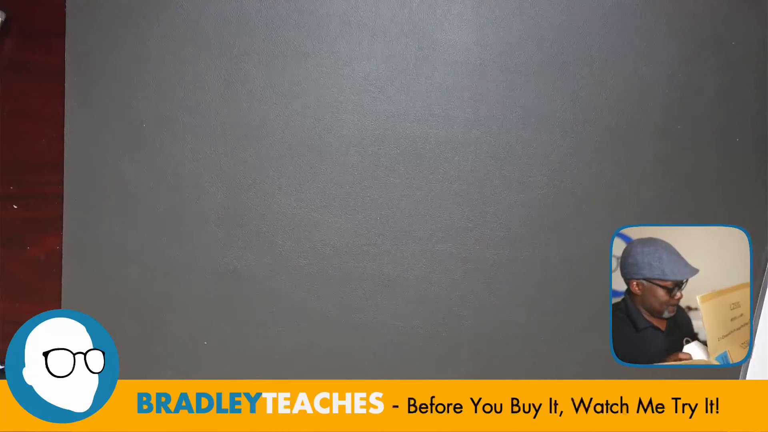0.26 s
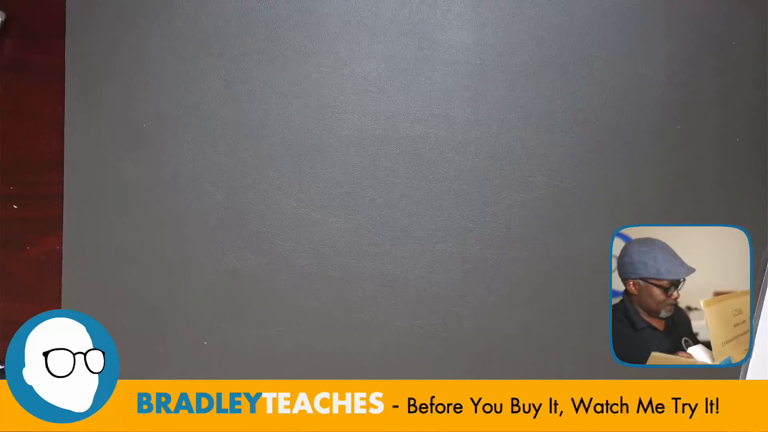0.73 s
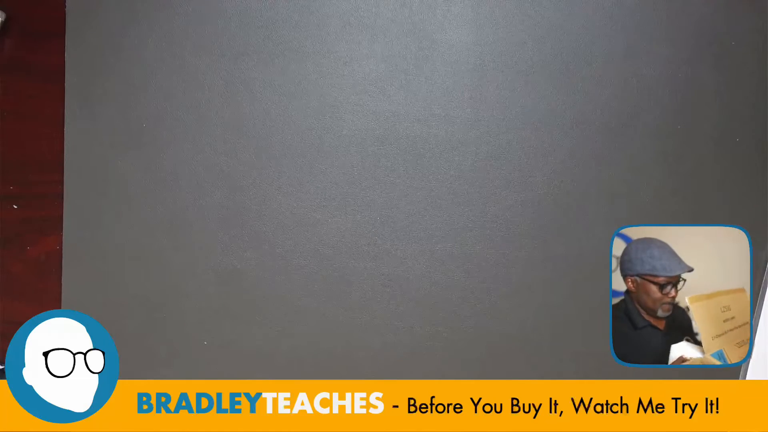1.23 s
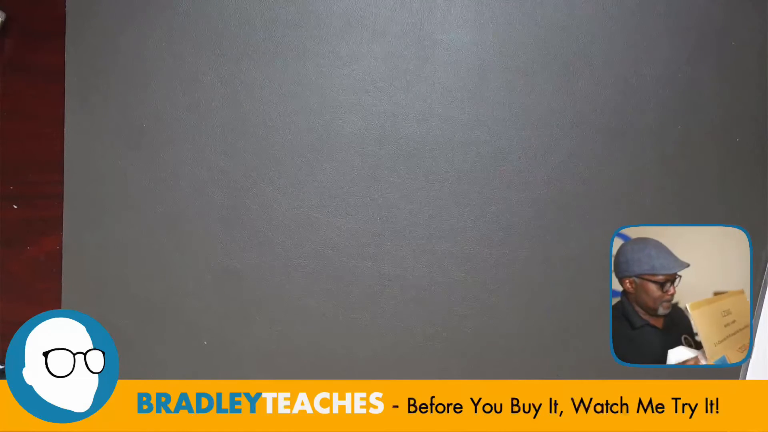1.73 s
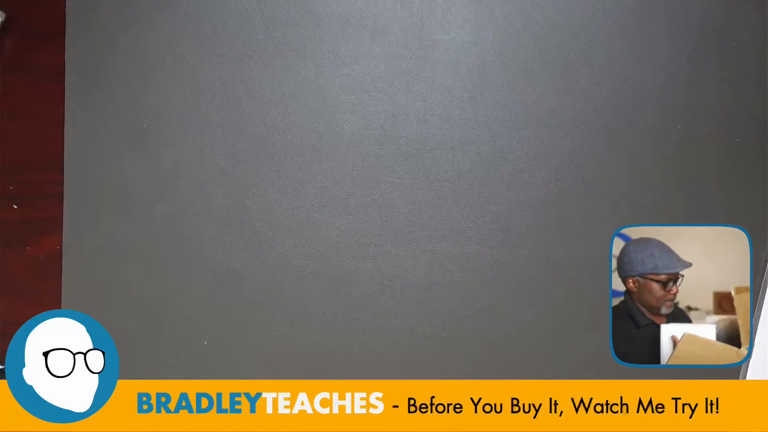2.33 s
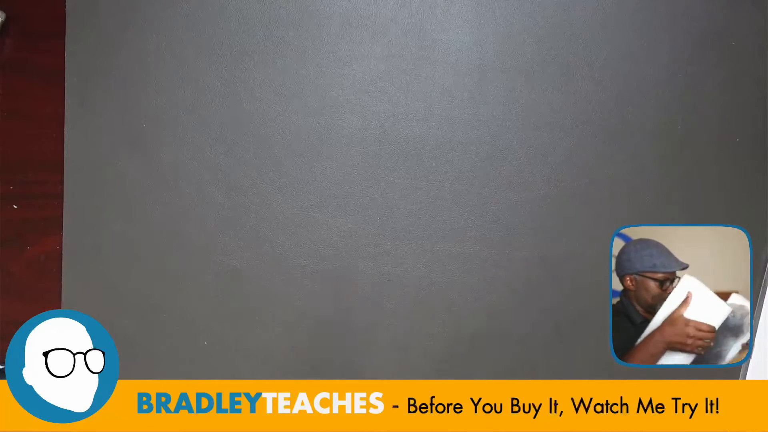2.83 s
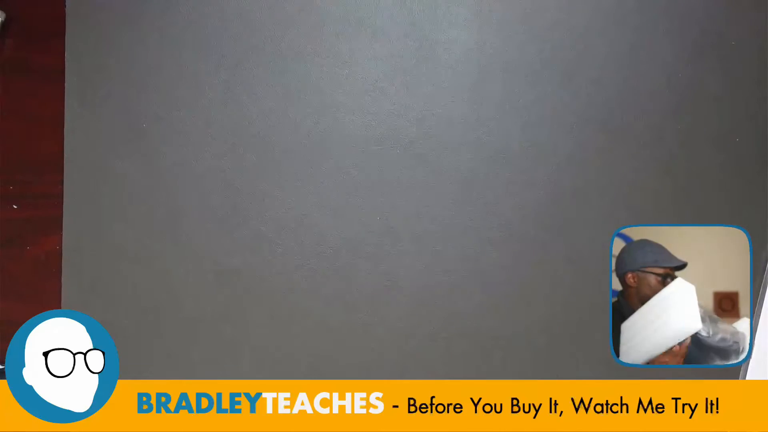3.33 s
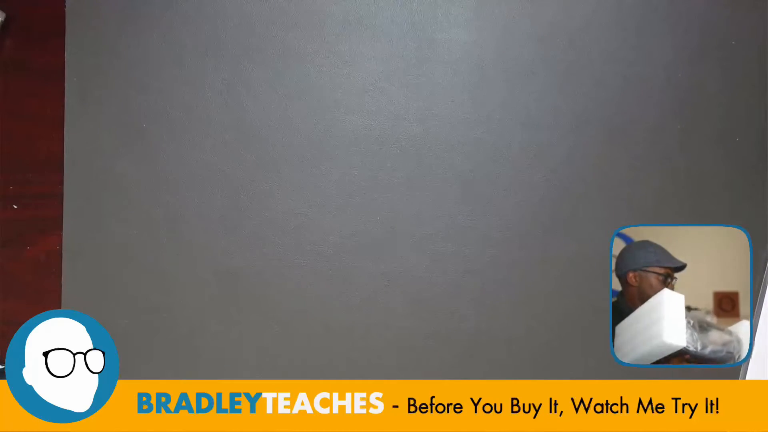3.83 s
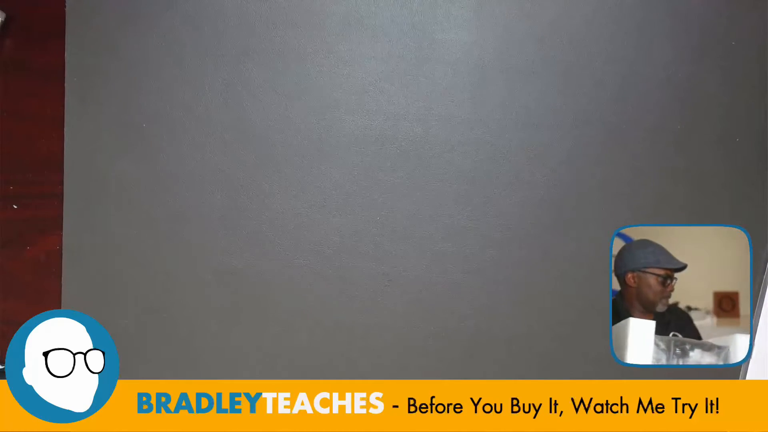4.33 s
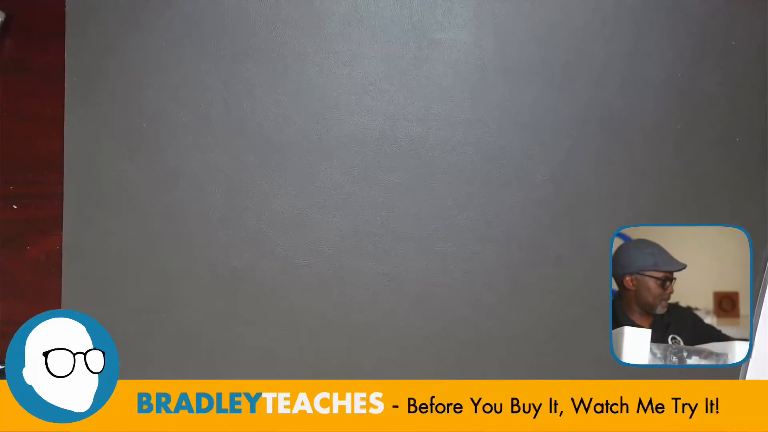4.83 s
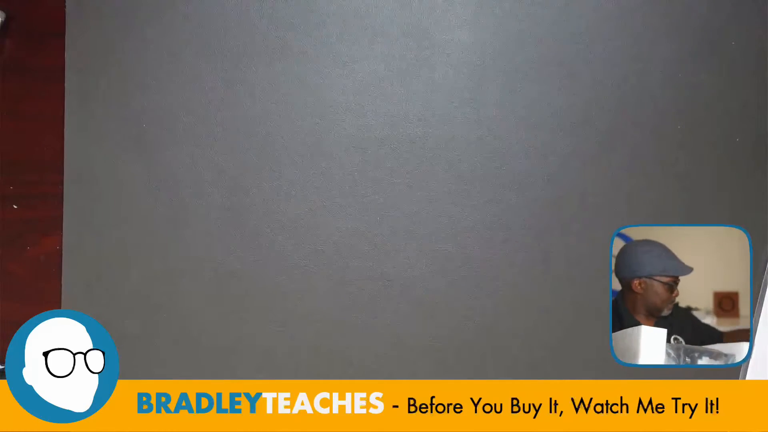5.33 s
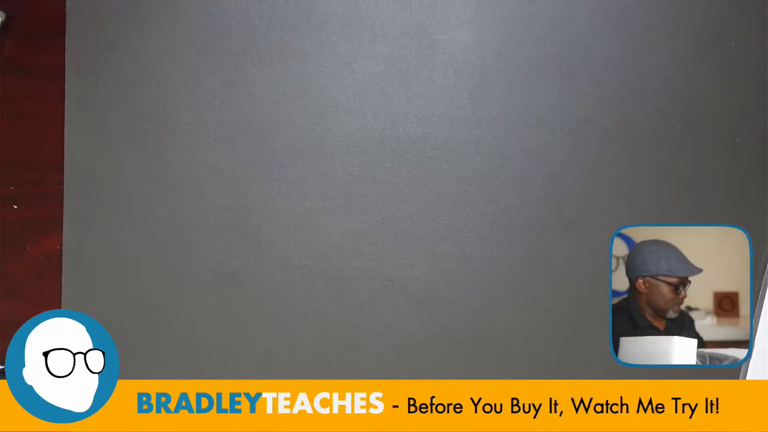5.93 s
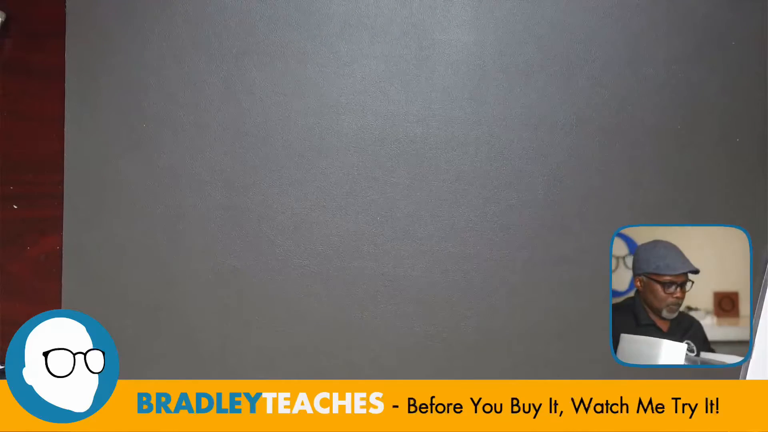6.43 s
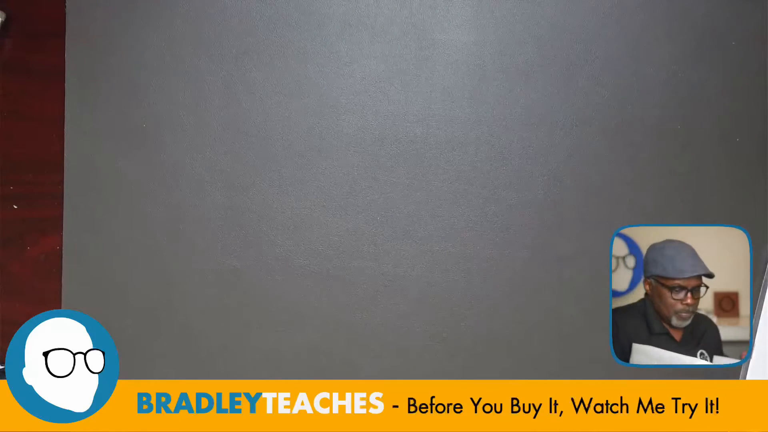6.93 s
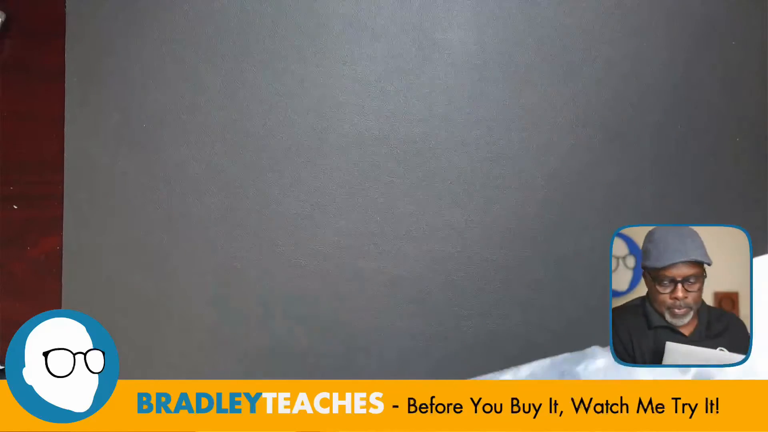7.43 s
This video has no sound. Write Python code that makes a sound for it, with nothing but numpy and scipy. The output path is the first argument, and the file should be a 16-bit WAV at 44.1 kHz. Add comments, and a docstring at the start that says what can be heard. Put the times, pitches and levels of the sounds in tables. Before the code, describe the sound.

Close, uneven rubbing of packing foam against cardboard, with hollow knocks, a crinkling plastic wrapper and a heavy thump on a desk.

```python
"""A soft scrape of foam on cardboard, close up in a small room: a foam block is worked out of its box
and set down on a desk. The beads hiss and judder as they catch on the card, the foam groans on the
desk, and a plastic wrapper crackles. Hands rumble the box, blows knock its panels, and heavy jolts
sway the desk with a deep thump. Faint room tone and hum sink behind a noise gate in the pauses."""
import sys
import numpy as np
from scipy import signal
from scipy.fft import rfft, irfft, next_fast_len
from scipy.io import wavfile
from scipy.ndimage import uniform_filter1d, map_coordinates

SR = 44100
rng = np.random.default_rng(int(sys.argv[2]) if len(sys.argv) > 2 else 0)


def wav_record(signal):
    """Record a signal, one row per channel, as 16-bit PCM in the file named by sys.argv[1]."""
    frames = np.transpose(np.atleast_2d(signal))
    bounded = np.clip(frames, -1, 1)
    # unit amplitude maps onto the largest positive 16-bit level
    quanta = np.round(bounded * 32767).astype(np.int16)
    wavfile.write(sys.argv[1], SR, quanta)


N = 338247

# room tone spectrum: (f/Hz, level/dB)
ROOM_TONE_EQ = [(15, -48.5), (25, -17.5), (66, -7), (122, -4), (188, -17), (703, -24), (871, -22.5),
                (1020, -28), (4150, -32.5), (15500, -30.5)]
# electrical hum partials: (f/Hz, level/dB)
HUM_PARTIALS = [(118.4, -56), (236, -60.5)]
# reverb time of the room: (f/Hz, t60/s)
ROOM_DECAY = [(100, 0.096), (260, 0.2), (700, 0.26), (3000, 0.27), (12000, 0.66)]
# low resonances of box and room: (f/Hz, width/Hz, level/dB)
BOX_MODES = [(105, 28, 3.5), (172.8, 11, 4.5), (230, 18, 3), (265.5, 25, -2.5), (314, 36, -15),
             (394.2, 15, -2.5), (484, 68, -14)]
# the microphone's treble ripples: (f/Hz, width/Hz, level/dB)
MIC_RIPPLES = [(5670, 200, -4), (6280, 320, 2.5), (8060, 180, -1.5), (11400, 300, -1.5), (15730, 2500, -4)]

# tone colours of foam hiss, bead fizz, cardboard, judder and snap: (f/Hz, level/dB)
HISS_EQ = [(700, -35), (1500, -7), (2300, -3.5), (3800, 0), (5000, -2), (7000, -7), (9000, -18),
           (12000, -48.5)]
FIZZ_EQ = [(5000, -34), (8000, -4.5), (9800, -5), (12000, -12), (16000, -16)]
CARD_EQ = [(120, -23.5), (280, -0.5), (430, -2), (720, -2), (1080, 0.5), (1600, -1), (2300, -7.5),
           (4000, -32.5)]
JUDDER_EQ = [(60, -3), (200, -2), (700, 4.5), (1200, -2.5), (2200, -7.5), (4500, -5.5), (7000, -27),
             (10000, -30.5), (16000, -44.5)]
SNAP_EQ = [(300, -15), (1200, -5.5), (3800, 5), (7000, 1), (11000, -7.5), (16000, -21)]
# tone colours of the brushing sleeve, wrapper ticks and the sub-bass rumble: (f/Hz, level/dB)
BRUSH_EQ = [(3500, -47), (5300, -9), (6300, -5), (6900, -10), (7700, -11.5), (11000, -33.5)]
WRAPPER_EQ = [(800, -22.5), (2500, -5.5), (6000, 0.5), (9500, 1), (12000, -6.5), (16000, -17)]
SUB_BASS_EQ = [(15, -17.5), (37, 6.5), (55, -14.5), (90, 7), (150, -27), (400, -68)]

# light brushes of a sleeve: (t/s, rise/s, fall/s, level/dB)
BRUSHES = [(4.925, 0.043, 0.123, -45)]
# fader curve of the flexing wrapper: (t/s, relative level/dB)
WRAPPER_FADER = [(2.9, -78), (3.1, -40.5), (3.55, -45.5), (3.9, -45), (4.42, -46.5), (4.9, -60.5),
                 (4.98, -49.5), (5.42, -70)]
# snaps of wrapper and foam beads: (t/s, relative level/dB, f/Hz)
SNAPS = [(0.0834, -30, 3380), (0.159, -26, 1760), (0.6418, -14, 1550), (0.7577, -15, 3300),
         (1.03, -6, 1480), (1.0644, -20, 1900), (1.0927, -15.5, 1670), (1.1657, -12.5, 3660),
         (1.5546, -14.5, 1840), (2.128, -13, 1720), (2.9537, -17, 2170), (3.041, -13, 3460),
         (3.211, -19.5, 4650), (3.305, -16.5, 4070), (3.3774, -15.5, 3350), (3.5314, -17, 4040),
         (3.5973, -19, 6450), (3.6172, -17, 7600), (3.7383, -17, 2650), (3.8508, -19, 4170),
         (3.8714, -22, 6080), (3.9396, -19.5, 4200), (4.2367, -20, 4920), (4.364, -14.5, 7100),
         (4.4218, -16, 8800), (4.433, -21, 2150), (4.5501, -19.5, 4630), (4.6342, -20, 3290),
         (5.409, -36.5, 4730), (5.548, -44, 5300), (5.6453, -46, 4470), (5.679, -32.5, 5400),
         (5.8737, -33, 2010), (6.0603, -37, 4350), (7.0279, -23, 4220)]
# hands pushing the box about: (t/s, rise/s, fall/s, level/dB)
PUSHES = [(.14, 0.053, 0.064, -39.5), (.53, 0.061, 0.89, -40), (1.03, 0.067, .25, -37),
          (1.44, 0.14, 0.2, -38), (1.88, .18, 0.15, -31.5), (2.33, 0.076, 0.086, -42.5),
          (3.038, 0.023, 0.072, -20), (3.18, .09, 0.2, -22.5), (3.69, 0.062, 0.71, -44.5),
          (4.47, 0.046, 0.2, -35.5), (4.62, 0.1, 0.086, -22), (4.95, 0.18, 0.16, -45),
          (5.68, 0.15, 0.27, -55.5), (6.34, 0.16, 0.24, -50.5), (6.56, 0.13, 0.11, -25.5),
          (6.925, 0.024, 0.18, -36), (7.22, 0.036, 0.16, -44)]
# jolts that sway the desk: (t/s, level/dB, f/Hz, decay/s)
JOLTS = [(3.045, -5, 36.6, 0.12), (3.335, -15.5, 37.7, 0.11), (4.645, -21, 36.7, 0.063),
         (6.96, -35.5, 39.8, 0.21), (7.462, -28.5, 38.8, 0.072)]
# foam rubbing on the desk: (t/s, length/s, level/dB, f/Hz)
GROANS = [(3.346, 0.037, -27, 329), (4.694, 0.15, -32.5, 423), (4.78, 0.1, -39, 404)]
# foam juddering along the card: (t/s, length/s, level/dB, slip rate/Hz)
JUDDERS = [(1.039, 0.13, -33.5, 300), (6.592, 0.05, -22, 480), (6.634, 0.078, -37, 260),
           (6.695, 0.054, -26.5, 240), (7.222, 0.032, -45, 280)]
# quick scuffs of foam: (t/s, relative level/dB, length/s)
SCUFFS = [(0.637, -19, 0.051), (0.75, -21, 0.046), (1.48, -18.5, 0.038), (1.875, -13.5, 0.057),
          (2.085, -12, 0.03), (3.457, -11.5, 0.038), (3.656, -13.5, 0.022)]
# blows on box and foam: (t/s, level/dB, f/Hz, ring length/cycles, room send/dB, clack mix/dB)
KNOCKS = [(0.1598, -25, 630, 9.2, -1, 1), (0.642, -29.5, 172, 8.7, -1, -8),
          (0.761, -21.5, 212, 13, -15, -22.5), (0.863, -29, 91.5, 14, -5, -26.5),
          (0.967, -27.5, 760, 6.3, 3.5, -4), (1.0315, -2.5, 1100, 11.6, -10, -6),
          (1.035, -9, 170, 5.4, -5.5, -24), (1.041, -14.5, 308, 6.2, 0, -20.5),
          (1.448, -24, 203, 6.7, -14, -18), (1.5658, -15, 484, 9.8, -4.5, -9.5),
          (1.572, -21.5, 198, 6.5, -6, -22), (1.896, -8, 188, 6.3, -8, -36), (2.0, -17, 470, 8.8, -3, -15),
          (2.018, -21.5, 129, 7.2, -7, -25), (2.13, -10, 182, 8.3, -4, -10.5),
          (2.384, -22.5, 160, 2.7, 0, -22), (3.0395, -4, 217, 12, -9, -9.5),
          (3.052, -8, 387, 4.5, -3, -25.5), (3.215, -17, 101, 6.6, 0.5, -16.5),
          (3.253, -17, 109, 5.2, -6, -33), (3.307, -13.5, 281, 17, -6, -6.5),
          (3.3311, 2, 222, 2.4, -6, -21), (3.357, -15.5, 275, 4, -1, -22.5),
          (3.74, -27, 160, 9.6, -7, -6.5), (4.495, -30.5, 272, 5.3, 7, -19),
          (4.634, -12.5, 194, 9.2, -14.5, -14), (4.699, -10, 192, 8.7, -7.5, -11.5),
          (5.182, -32, 254, 11, -2, -9.5), (5.964, -47, 800, 6, 4, -10), (6.714, -14, 165.5, 11, -12, -5.5),
          (7.5952, -34.5, 740, 4.4, -9, -2)]
# strokes of foam along the card: (t/s, rise/s, fall/s, hiss level/dB, rasp level/dB)
STROKES = [(0, 0.0033, 0.13, -43.5, -43.5), (.17, 0.13, 0.14, -31.5, -34), (.53, 0.17, 0.31, -37.5, -42),
           (1.007, 0.036, 0.12, -34.5, -30.5), (1.21, 0.12, 0.081, -33.5, -37.5),
           (1.45, 0.067, 0.093, -39, -42.5), (1.62, 0.079, 0.14, -54, -56),
           (1.729, 0.16, 0.098, -30, -36.5), (1.97, 0.12, 0.13, -35, -42), (2.271, 0.083, 0.32, -37.5, -41),
           (2.69, 0.16, 0.11, -40.5, -46.5), (2.951, .012, 0.1, -34.5, -37.5),
           (3.039, 0.0095, 0.091, -26.5, -32), (3.13, 0.078, 0.099, -31, -37),
           (3.29, 0.078, 0.27, -35.5, -42.5), (3.655, 0.016, 0.2, -37.5, -40),
           (3.82, 0.057, 0.081, -40, -41), (3.93, 0.073, 0.15, -38, -46.5), (4.07, 0.079, 0.4, -36.5, -41),
           (4.6, 0.1, .13, -37.5, -38.5), (4.93, 0.11, .14, -46, -49), (5.677, .008, .3, -58, -68.5),
           (5.9, 0.072, .06, -62, -61), (6.33, 0.076, 0.27, -42.5, -51.5), (6.519, .025, 0.18, -35.5, -41),
           (6.585, .025, 0.098, -25.5, -23.5), (6.68, 0.022, 0.13, -32, -33.5),
           (6.87, .24, 0.24, -41.5, -44.5), (7.222, 0.017, 0.08, -34, -37.5),
           (7.39, 0.14, 0.21, -49.5, -53.5)]


def amp(db):
    """Decibels to gain."""
    return 10 ** (np.asarray(db) / 20)


def unit(x):
    """Scale to rms 1."""
    return x / np.sqrt(np.mean(x ** 2) + 1e-20)


def along(points, hz):
    """Read (f/Hz, value) points on a log frequency axis."""
    freqs, values = np.transpose(points)
    return np.interp(np.log(hz + 1), np.log(freqs + 1), values)


def wobble(rate):
    """A smooth random curve, rate knots a second."""
    return map_coordinates(rng.standard_normal(4096), [np.arange(N) * rate / SR], mode="wrap")


def colour(x, gain):
    """Minimum-phase EQ whose gain is a function of frequency."""
    size = 2 * next_fast_len(len(x) // 2 + 4096)
    cepstrum = irfft(np.log(np.maximum(gain(np.fft.rfftfreq(size, 1 / SR)), 1e-6)))
    cepstrum[1:size // 2] *= 2
    cepstrum[size // 2 + 1:] = 0
    return irfft(rfft(x, size) * np.exp(rfft(cepstrum)))[:len(x)]


def shaped(x, eq):
    """x through an (f/Hz, level/dB) curve, at rms 1."""
    return unit(colour(x, lambda hz: amp(along(eq, hz))))


def add(track, start, x):
    """Mix x into the track, start seconds in."""
    first = max(round(start * SR), 0)
    track[first:first + len(x)] += x[:max(N - first, 0)]


def grains(rate, spread_db, smooth):
    """Tiny random slips of uneven size; smooth is the share of power in plain rubbing noise."""
    slips = (rng.random(N) < rate / SR) * rng.standard_normal(N)
    slips *= amp(spread_db * rng.standard_normal(N))
    return np.sqrt(1 - smooth) * unit(slips) + np.sqrt(smooth) * rng.standard_normal(N)


def swells(moves):
    """Envelope of moves (t/s, rise/s, fall/s, level/dB) that speed up and run out, summed in power."""
    power, t = np.zeros(N), np.arange(3 * SR // 2) / SR
    for start, rise, fall, db in moves:
        gather = np.sin(np.pi / 2 * np.clip(t / rise, 0, 1)) ** 0.85
        run_out = np.exp(-np.maximum((t - rise) / fall, 0) ** 1.27)
        add(power, start, (amp(db) * gather * run_out) ** 2)
    return np.sqrt(power)


def room_tone():
    """The bed: faint room noise and a wavering electrical hum."""
    t = np.arange(N) / SR
    hum = sum(amp(db + wobble(2.3)) * np.sqrt(2) * np.sin(2 * np.pi * hz * t) for hz, db in HUM_PARTIALS)
    return hum + amp(-53) * shaped(rng.standard_normal(N), ROOM_TONE_EQ)


def noise_gate(key, threshold_db=-57.5, depth_db=-13, window_s=0.044):
    """Gain of a soft gate that closes whenever the key signal falls quiet."""
    power = np.abs(uniform_filter1d(key ** 2, int(window_s * SR)))
    shut = 1 / (1 + (power / amp(threshold_db) ** 2) ** 2)
    return amp(depth_db * shut)


def reverb(x, predelay_s=0.0054):
    """The small room's tail, longest in the treble, with the same energy as the dry sound."""
    hz, t, spectrum = signal.stft(rng.standard_normal(SR // 2), SR, nperseg=256)
    decay = amp(-60 * t / along(ROOM_DECAY, hz)[:, None])
    tail = signal.istft(spectrum * decay, SR, nperseg=256)[1]
    wet = signal.fftconvolve(x, np.pad(tail, (int(predelay_s * SR), 0)))[:len(x)]
    return unit(wet) * np.std(x)


def box_resonance(hz):
    """Gain of the low modes of box and room, summed in power."""
    modes = (amp(db) * hz * width / (centre ** 2 - hz ** 2 + 1j * hz * width)
             for centre, width, db in BOX_MODES)
    return np.sqrt(sum(np.abs(mode) ** 2 for mode in modes))


def sleeve_brushes():
    """A sleeve brushing past gives a narrow, high swish."""
    return swells(BRUSHES) * shaped(rng.standard_normal(N), BRUSH_EQ)


def wrapper_crinkle():
    """The thin wrapper ticks at random as it flexes, brighter than the foam."""
    t = np.arange(N) / SR
    times, levels_db = np.transpose(WRAPPER_FADER)
    fader = amp(np.interp(t, times, levels_db) - 3) * (t > times[0]) * (t < times[-1])
    return fader * shaped(grains(rate=420, spread_db=0.5, smooth=0.02), WRAPPER_EQ)


def snaps():
    """A crease or bead gives way with a crack and a brief ping; smaller creases snap brighter."""
    out, t = np.zeros(N), np.arange(SR // 4) / SR
    burst = (1 - np.exp(-t / 0.00034)) * np.exp(-t / 0.0026)
    pivot_hz = 3000
    for start, db, hz in SNAPS:
        tilt_db_per_octave = 1.8 * np.log2(hz / pivot_hz)
        tilted_eq = [(f, level + tilt_db_per_octave * np.log2(f / pivot_hz)) for f, level in SNAP_EQ]
        crack = shaped(rng.standard_normal(len(t)) * burst, tilted_eq)
        ping = unit(np.sin(2 * np.pi * hz * t) * burst)
        snap = crack + 0.5 * ping
        snap *= amp(db - 4) / np.abs(snap).max()
        add(out, start, snap + amp(-5) * reverb(snap))
    return out


def handling_rumble(rasp_gain, shake_db=-9, low_cut_hz=60, high_cut_hz=650):
    """Soft pushes and the strokes make the box rumble; a deep sub-bass rumble follows the handling."""
    force = np.hypot(swells(PUSHES), amp(shake_db) * rasp_gain)
    friction = grains(rate=400, spread_db=2, smooth=0.7)
    rumble = colour(friction, lambda hz: box_resonance(hz)
                    / (1 + (hz / high_cut_hz) ** 4) / (1 + (low_cut_hz / (hz + 1)) ** 4))
    sub_bass = shaped(rng.standard_normal(N), SUB_BASS_EQ)
    return force * (unit(rumble) + amp(-10) * sub_bass)


def desk_thumps():
    """The desk sways in its lowest mode after a heavy jolt."""
    out, t = np.zeros(N), np.arange(SR) / SR
    for start, db, hz, decay in JOLTS:
        envelope = (1 - np.exp(-t / 0.014)) * np.exp(-t / decay)
        add(out, start, -amp(db) * envelope * np.sin(2 * np.pi * hz * t))
    return out


def foam_groans():
    """Foam dragged on the desk chatters at a wavering pitch, with weaker overtones."""
    out = np.zeros(N)
    for start, length, db, hz in GROANS:
        progress = np.linspace(0, 1, int(length * SR))
        pitch = hz * amp(0.8 * wobble(179.3)[:len(progress)])
        phase = 2 * np.pi * np.cumsum(pitch) / SR
        chatter = np.sin(phase) + amp(-11.5) * np.sin(2 * phase) + amp(-13) * np.sin(3 * phase)
        pressure = np.abs(np.sin(np.pi * progress ** 0.55)) * amp(2.5 * wobble(120)[:len(progress)])
        add(out, start, amp(db) * unit(chatter * pressure))
    return out + amp(-10.5) * reverb(out)


def foam_judders():
    """Foam pressed on card sticks and slips at an uneven rate, chopping noise into a rasp."""
    force = np.zeros(N)
    for start, length, db, rate in JUDDERS:
        progress = np.linspace(0, 1, int(length * SR))
        cycles = np.cumsum(rate * amp(2.1 * wobble(200)[:len(progress)])) / SR
        slips = unit(0.4 + np.exp(-(cycles % 1) / 0.3))
        pressure = np.sqrt(np.abs(np.sin(np.pi * progress ** 0.38)))
        add(force, start, amp(db) * slips * pressure)
    rasp = shaped(force * rng.standard_normal(N), JUDDER_EQ)
    return rasp * np.sqrt(np.mean(force ** 2))


def foam_scuffs():
    """A foam edge skids briefly: a dense spray of bright grains."""
    envelope, t = np.zeros(N), np.arange(N) / SR
    for start, db, length in SCUFFS:
        progress = np.clip((t - start) / length, 0, 1)
        envelope += amp(db - 15.5) * np.sin(np.pi * np.sqrt(progress))  # bites fast, lets go slowly
    spray = shaped(grains(rate=2500, spread_db=2, smooth=0.5), SNAP_EQ)
    fizz = shaped(grains(rate=1600, spread_db=4, smooth=0.42), FIZZ_EQ)
    return envelope * (spray + amp(-12.5) * fizz)


def box_knocks():
    """Each blow swings a damped panel for a few cycles; hard contact adds a clack; box and room ring."""
    out, t = np.zeros(N), np.arange(SR // 2) / SR
    for start, db, hz, ring_cycles, room_db, clack_db in KNOCKS:
        cycles = hz * t
        attack = 1 - np.exp(-(cycles / 0.66) ** 2)
        swing = np.sin(2 * np.pi * cycles) * attack * amp(-60 * cycles / ring_cycles)
        clack = shaped(rng.standard_normal(len(t)) * np.exp(-t / 0.0055), CARD_EQ)
        blow = amp(db) * (swing / np.abs(swing).max() + amp(clack_db) * clack / np.abs(clack).max())
        ring = colour(reverb(blow), lambda f: box_resonance(f) + 0.51)
        add(out, start, blow + amp(room_db) * np.std(blow) * unit(ring))
    return out


def foam_slide(hiss_gain, rasp_gain):
    """Foam beads catch on the card with an uneven grip: they hiss and fizz, and the panel rasps."""
    grip_db = 0.86 * wobble(70) + 0.52 * wobble(22)
    hiss = hiss_gain * shaped(grains(rate=2000, spread_db=3, smooth=0.8), HISS_EQ)
    fizz_gain = amp(-49) * (hiss_gain / amp(-38)) ** 0.81  # grows 0.81 dB per dB of hiss
    fizz = fizz_gain * shaped(grains(rate=1000, spread_db=3, smooth=0.65), FIZZ_EQ)
    rasp = rasp_gain * shaped(grains(rate=1200, spread_db=2, smooth=0.7), CARD_EQ)
    return amp(grip_db) * (hiss + fizz + rasp)


def scene():
    """The mono mix: hiss and rasp ride the same strokes, and the action keys the gate on the bed."""
    hiss_gain = swells([(*timing, hiss_db) for *timing, hiss_db, _ in STROKES])
    rasp_gain = swells([(*timing, rasp_db) for *timing, _, rasp_db in STROKES])
    rubbing = foam_slide(hiss_gain, rasp_gain) + handling_rumble(rasp_gain)
    rubbing += foam_scuffs() + foam_judders() + foam_groans() + sleeve_brushes()
    action = rubbing + box_knocks() + snaps() + wrapper_crinkle() + desk_thumps()
    return (action + noise_gate(action) * room_tone())[None]


def record(dry):
    """The microphone ripples the treble, rounds off the highest peaks and cuts the very top."""
    ceiling, top_hz = 0.95, 15780
    rippled = colour(dry[0], lambda f: amp(sum(db * np.exp(-((f - hz) / width) ** 2)
                                               for hz, width, db in MIC_RIPPLES)))
    rounded = rippled / (1 + np.abs(rippled / ceiling) ** 8) ** (1 / 8)
    size = next_fast_len(N + SR // 4)
    passband = np.fft.rfftfreq(size, 1 / SR) < top_hz
    return irfft(rfft(rounded, size) * passband, size)[None, :N]


dry = scene()
out = record(dry)
wav_record(out)
```